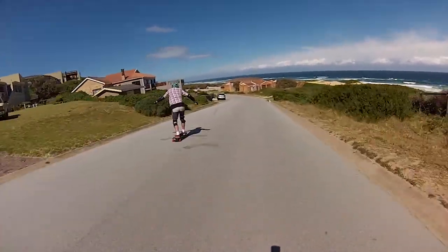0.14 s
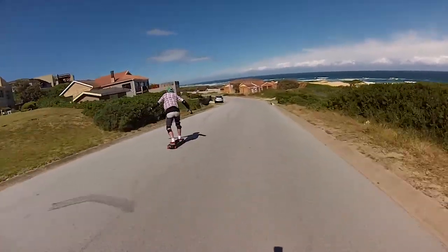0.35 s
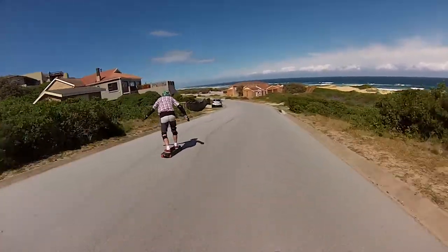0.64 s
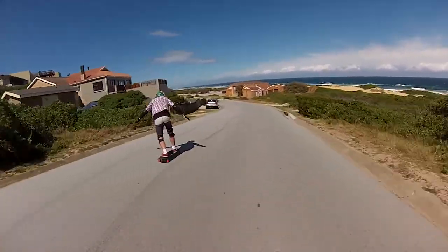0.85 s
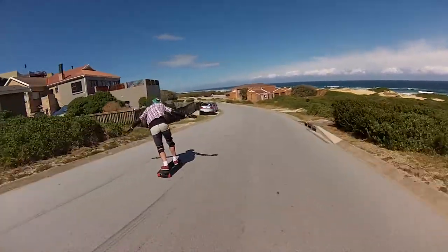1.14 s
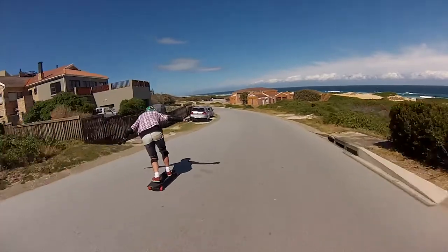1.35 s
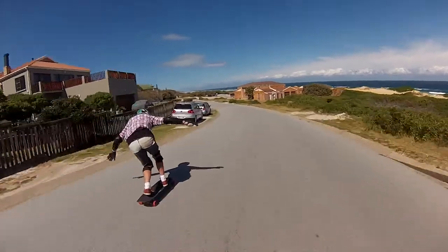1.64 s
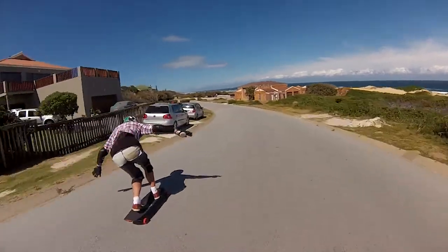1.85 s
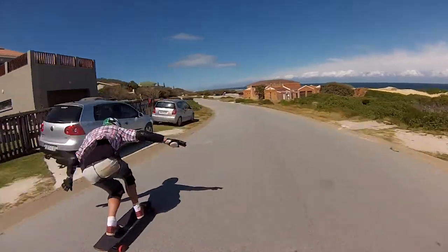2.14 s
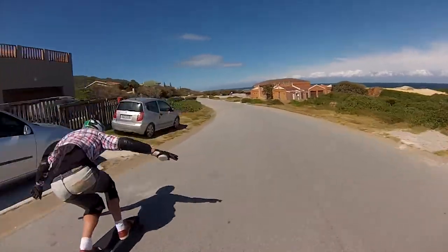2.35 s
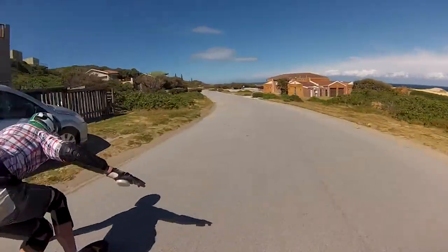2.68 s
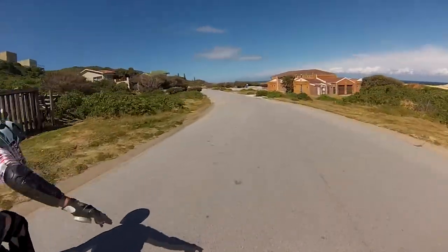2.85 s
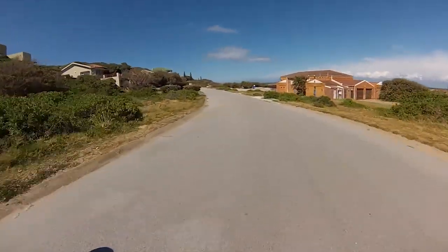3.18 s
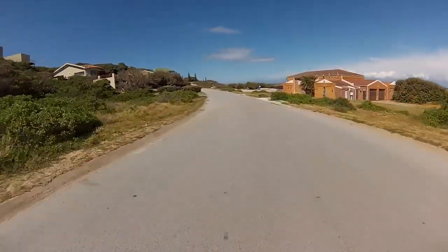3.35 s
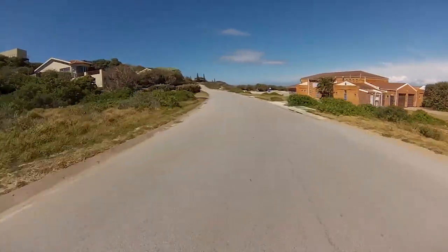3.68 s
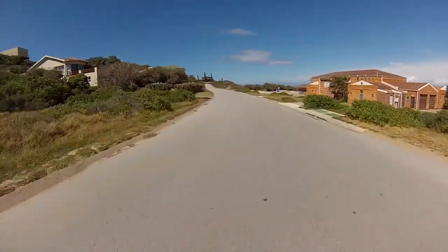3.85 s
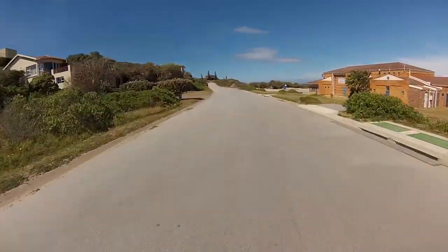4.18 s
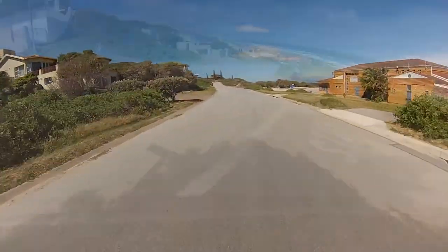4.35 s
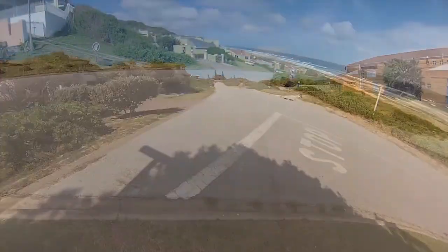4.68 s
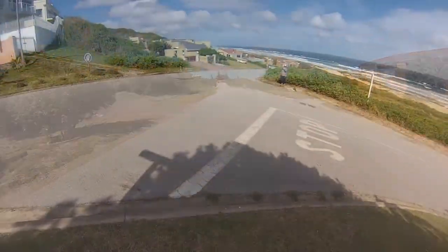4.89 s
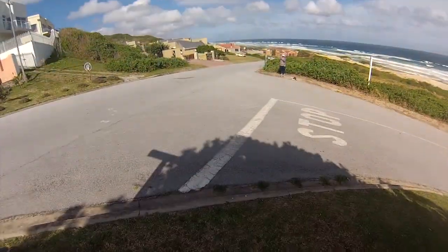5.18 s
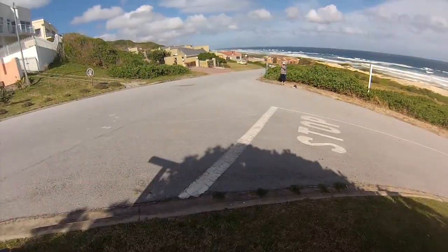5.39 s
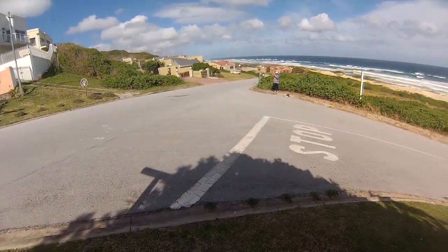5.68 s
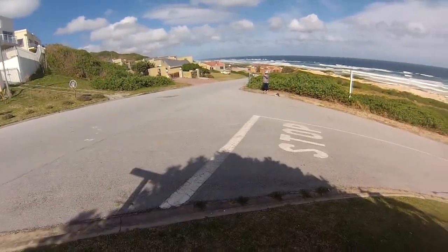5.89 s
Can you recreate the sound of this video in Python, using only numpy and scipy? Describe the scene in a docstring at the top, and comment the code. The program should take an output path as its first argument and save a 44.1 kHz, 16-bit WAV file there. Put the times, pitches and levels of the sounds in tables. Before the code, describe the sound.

Close on a longboard speeding downhill, a sealed camera picks up a continuous coarse wheel roar, hollow deck hum and gritty hiss, with pulsing low rumble and muffled wind thuds. After about four seconds it cuts off hard. At a quiet roadside the camera is knocked, rubbed and wobbled by a hand, and finally another board's rolling hiss rises quickly.

```python
"""A longboard rides downhill: shared road bumps shake noise through deck, housing and grit resonances.
It carries a camera in a sealed housing; its mount adds a low, unsteady tone, and wind thuds beneath.
The ride cuts off; the camera is then held at the roadside, where it wobbles and is rubbed and knocked.
There another board rolls up and hisses past as patchy resonant noise, over quiet open air."""
import sys
import numpy as np
from scipy import signal
from scipy.fft import rfft, irfft
from scipy.io import wavfile
from scipy.ndimage import uniform_filter1d

SR = 44100
rng = np.random.default_rng(int(sys.argv[2]) if len(sys.argv) > 2 else 0)


def boost(x):
    """Linear amplitude factor 10**(x/20) for a level x in decibels (scalar or array-like)."""
    u = np.asarray(x, float) / 20
    return 10 ** u


def wav_record(signal):
    """Record a signal, one row per channel, as 16-bit PCM in the file named by sys.argv[1]."""
    frames = np.transpose(np.atleast_2d(signal))
    bounded = np.clip(frames, -1, 1)
    # unit amplitude maps onto the largest positive 16-bit level
    quanta = np.round(bounded * 32767).astype(np.int16)
    wavfile.write(sys.argv[1], SR, quanta)


N = 265482
T = np.arange(N) / SR
CUT_S = 4.187  # the ride ends and the roadside begins

# resonances of the held housing: (frequency [Hz], width [Hz], relative level [dB])
SHELL = [(331, 42, 1.5), (622, 110, -8.5), (1220, 320, -4.5), (1994, 170, 2), (2330, 250, -4),
         (2650, 280, -4), (3760, 270, -19.5), (4400, 300, -23), (5320, 470, -24.5)]
# jolt of the first knock: (time [s], level [dB], frequency [Hz], decay to either side [cycles])
JOLT = (4.2645, -7.5, 44, .45)


def level(x):
    """Scale to rms 1."""
    return x / np.sqrt(np.mean(x ** 2))


def columns(table):
    """Every column after the first as a curve over time."""
    s, *cols = np.transpose(table)
    return [np.interp(T, s, c) for c in cols]


def shape(x, power):
    """Filter with the minimum-phase response that has this power at each Hz, built from its cepstrum."""
    size = 8192
    hz = np.fft.rfftfreq(size, 1 / SR) + 1  # the offset avoids log(0)
    cepstrum = irfft(.5 * np.log(power(hz) + 1e-12))
    # folding onto positive times makes the response causal
    cepstrum[1:size // 2] *= 2
    cepstrum[size // 2 + 1:] = 0
    response = irfft(np.exp(rfft(cepstrum)))
    return signal.fftconvolve(x, response)[:N]


def ring(x, modes, steep=1.48):
    """Excite a body with these resonances; a higher steep gives each peak steeper skirts."""
    def power(f):
        return sum(boost(db) ** 2 / (1 + (2 * (f - hz) / width) ** 2) ** steep for hz, width, db in modes)
    return shape(x, power)


def colour(x, points):
    """Filter to a smooth spectrum drawn through (Hz, dB) points."""
    hz, db = np.transpose(points)
    return shape(x, lambda f: boost(2 * np.interp(np.log(f), np.log(hz), db)))


def walk(rate):
    """Random levels held 1 / rate s and smoothed twice; rms 1."""
    k = int(SR / rate)
    held = np.repeat(rng.standard_normal(N // k + 1), k)
    return level(uniform_filter1d(uniform_filter1d(held, k), k)[:N])


def grain(patchy_db, rate):
    """Dense contact noise whose strength comes in patches."""
    return level(rng.standard_normal(N) * boost(patchy_db * walk(rate)))


def swells(events, gain):
    """Sum of bell-shaped swells, each as long as the span between its 1/e points."""
    return sum(gain(db) * np.exp(-(2 * (T - s) / length) ** 2) for s, length, db in events)


def thuds(modes, patchy_db):
    """Dull low thuds: slowly patchy noise through low resonances."""
    return level(ring(grain(patchy_db, 12), modes, steep=2.47))


def unsteady_tone(table, events, drift, flutter_db, buffet_db):
    """A low tone that wanders in pitch, flutters and swells, over deep buffeting."""
    hz, resting_db = columns(table)
    phase = 2 * np.pi * np.cumsum(hz * (1 + drift * walk(30))) / SR
    tone = level(boost(flutter_db * walk(45)) * np.sin(phase))
    buffet = level(ring(rng.standard_normal(N), [(23.8, 20, 0.012)], steep=2.67))
    return (boost(resting_db) + swells(events, boost)) * (tone + boost(buffet_db) * buffet)


def open_air():
    """Quiet roadside air: slightly uneven noise with a smooth spectrum."""
    # spectrum of the air: (frequency [Hz], relative density [dB per Hz])
    air_spectrum = [(59, -45), (100, -14), (162, -8.5), (320, -5), (870, -20), (1830, -32), (2060, -18),
                    (3070, -32.5), (12000, -34), (15600, -74), (22000, -120)]
    return boost(-58) * level(colour(grain(0.84, 10), air_spectrum))


def other_board():
    """A dull roll from afar; the bright wheel hiss comes only when the board is alongside."""
    # approach of the board: (time [s], rolling level [dB], wheel hiss level [dB])
    passing = [(4.2, -61.5, -68), (5.2, -60, -71.5), (5.75, -53.5, -65.5), (5.866, -52, -57),
               (5.878, -44, -45), (5.91, -49, -42), (5.935, -41.5, -44), (5.97, -46, -39.5),
               (6.02, -49, -45)]
    # resonances of the roll: (frequency [Hz], width [Hz], relative level [dB])
    roll_modes = [(330, 28, 1), (600, 110, -2), (1450, 390, 4), (2350, 900, -6.5), (4850, 730, -15.5)]
    # bands of the wheel hiss: (frequency [Hz], width [Hz], relative level [dB])
    hiss_modes = [(2320, 450, -2), (3500, 1200, 0), (4500, 690, -2), (5200, 400, -0.5), (6900, 1400, -3.5),
                  (11100, 1900, -12)]
    roll_db, hiss_db = columns(passing)
    roll = level(ring(grain(2.1, 30), roll_modes))
    hiss = level(ring(grain(1.5, 70), hiss_modes))
    return boost(roll_db) * roll + boost(hiss_db) * hiss


def hand_wobble():
    """A low, unsteady tone of the held camera wobbling; it comes up just after the jolt."""
    # tone of the wobble: (time [s], central pitch [Hz], resting level [dB])
    wobble_curve = [(4.3, 30.43, -30), (4.55, 29.43, -37), (4.7, 27.35, -31.5), (5.1, 26.3, -29.5),
                    (5.3, 27.3, -32.5), (5.55, 30.4, -33), (5.8, 29.1, -38), (6.02, 29.3, -39)]
    # swells of the low tone: (middle [s], length [s], level [dB])
    wobble_swells = [(4.287, 0.16, -23), (4.504, 0.038, -26), (4.787, 0.039, -36), (5.17, 0.043, -25),
                     (5.312, .08, -36), (5.62, 0.05, -31), (5.706, 0.082, -28)]
    onset = np.interp(T - JOLT[0], [.01, .03], [.3, 1])
    return unsteady_tone(wobble_curve, wobble_swells, drift=0.049, flutter_db=0.8, buffet_db=-5) * onset


def grip_bumps():
    """The gripping hand bumps the housing dully over a faint bed of the same thuds."""
    # bumps of the grip: (middle [s], length [s], level [dB])
    grip = [(4.31, .05, -36), (4.515, 0.063, -31), (4.62, 0.064, -30), (4.95, 0.082, -31), (5.03, .07, -31),
            (5.09, .05, -36), (5.2, .18, -34), (5.4, .06, -44), (5.64, .06, -42), (5.97, .1, -49)]
    still_db = -50.5
    thud = thuds([(66, 36, -0.5), (122, 112, -19)], 2.7)
    return (boost(still_db) + swells(grip, boost)) * thud


def finger_strokes():
    """Sliding fingers ring the shell; where they press decides which modes speak."""
    # strokes: (full strength reached [s], length [s], low modes [dB], 1.2 kHz mode [dB], middle modes [dB])
    strokes = [(4.269, 0.056, -60, -68, -53), (4.41, 0.053, -56, -55, -50), (4.474, 0.027, -50, -52.5, -57),
               (4.534, 0.046, -60, -59, -55.5), (4.6, .07, -52, -51.5, -52),
               (4.985, 0.039, -42, -54.5, -48), (5.029, .04, -53, -55, -51),
               (5.134, 0.066, -57.5, -57, -57)]
    attack_s, release_s, fade_db_s = 0.036, .018, -27
    high_db = -11  # high modes relative to the middle ones
    slides = []
    for modes in (SHELL[:2], SHELL[2:3], SHELL[3:6], SHELL[6:]):
        voices = [boost(1.5 * walk(16)) * ring(grain(1.9, 110), [mode], steep=1.67) for mode in modes]
        slides.append(level(sum(voices)))
    out = np.zeros(N)
    for s, length, low_db, one_db, middle_db in strokes:
        attack = np.clip((T - s) / attack_s + 1, 0, 1) ** 2
        release = np.exp(-np.maximum(T - s - length, 0) / release_s)
        fade = boost(fade_db_s * np.clip(T - s, 0, length))
        levels_db = (low_db, one_db, middle_db, middle_db + high_db)
        out += attack * release * fade * sum(boost(db) * slide for db, slide in zip(levels_db, slides))
    return out


def knocks():
    """Knocks rattle the same shell: short noise bursts through its middle and high modes."""
    # knocks: (time [s], peak level [dB], rattle time constant [ms], high modes' brightness [dB])
    knock_table = [(4.2555, -19, 2.2, 3), (4.2647, -33, 1.9, 11), (4.812, -46.5, 7.6, -20),
                   (5.11, -30, 1.1, 11.5)]
    chatter = rng.standard_normal(N)
    out = np.zeros(N)
    for s, db, ms, bright_db in knock_table:
        age = np.maximum(T - s, 0) * 1000 / ms
        rattle = chatter * age ** 0.33 * np.exp(-age)
        body = ring(rattle, SHELL[2:6], steep=1.02)
        edge = ring(rattle, SHELL[6:], steep=2.2)
        tick = body + boost(bright_db) * edge
        out += boost(db) * tick / np.abs(tick).max()
    return out


def jolt():
    """The first knock jolts the camera: a brief low swing under a bell envelope."""
    s, db, hz, cycles = JOLT
    turn = (T - s) * hz
    swing = np.sin(2 * np.pi * turn + .5) * np.exp(-(turn / cycles) ** 2)
    # the rebound stops short against the hand: a pointed crest
    crest = 0.21 * np.exp(-(np.abs(turn - .09) / 0.066) ** 1.8)
    return boost(db) * (swing + crest)


def riding_wind():
    """Wind thuds low and unevenly during the ride."""
    # strength of the wind: (time [s], level [dB])
    wind = [(0, -39), (.7, -36.5), (1.3, -31), (1.9, -35), (2.4, -40.5), (3.2, -38), (3.7, -39.5),
            (4.18, -37.5)]
    return boost(columns(wind)[0]) * thuds([(77.4, 23, -5), (109.0, 23.0, -1.5)], 4.0)


def mount_tone():
    """A low, unsteady tone of the mount, swelling and fading irregularly."""
    # tone of the mount: (time [s], central pitch [Hz], resting level [dB])
    tone_curve = [(0, 41, -27), (.6, 44.96, -29), (1.05, 36.1, -31), (1.6, 42.42, -36.5), (2.45, 46, -33),
                  (2.7, 41.6, -30), (2.95, 45.1, -30.5), (3.55, 45.1, -30.5), (3.7, 39, -29),
                  (4.18, 43.1, -28)]
    # swells of the low tone: (middle [s], length [s], level [dB])
    tone_swells = [(0.103, 0.089, -28), (0.236, 0.077, -17.5), (0.422, 0.1, -17), (0.594, 0.058, -25),
                   (0.705, 0.062, -19.5), (0.846, .1, -16.5), (0.986, 0.051, -15), (1.196, 0.057, -12.5),
                   (1.3, 0.11, -18.5), (1.392, 0.086, -19), (1.535, 0.13, -15), (1.696, 0.062, -17.5),
                   (1.824, 0.11, -19), (2.055, 0.15, -18.5), (2.256, 0.11, -22.5), (2.402, 0.079, -18),
                   (2.604, 0.086, -24.5), (2.698, 0.063, -18), (2.845, 0.055, -28), (3.079, 0.2, -27),
                   (3.227, 0.075, -24), (3.375, 0.13, -19.5), (3.56, 0.13, -26), (3.85, 0.14, -29),
                   (4.04, 0.13, -30.5)]
    return unsteady_tone(tone_curve, tone_swells, drift=0.121, flutter_db=2.5, buffet_db=-5)


def ride():
    """Stones in the asphalt shake wheels, deck and housing together, so all bands share the bumps."""
    # rolling noise between its swells: (time [s], level [dB])
    rolling_curve = [(0, -22), (.5, -22), (.9, -21), (1.3, -20), (1.45, -25), (2.0, -24), (2.8, -26),
                     (3.1, -23.5), (3.2, -24.5), (3.6, -24), (4.05, -26.5), (4.18, -24.5)]
    # brief swells of the rolling noise: (middle [s], length [s], added level [dB])
    rolling_swells = [(.27, 0.094, 3.5), (.47, 0.039, 2), (.7, 0.12, 6.5), (.84, 0.02, 4.5),
                      (1.03, 0.08, 3.5), (1.18, 0.034, 1.5), (1.5, 0.14, 4.5), (1.65, .05, 4),
                      (1.82, 0.097, 4), (2.03, 0.09, 2), (2.32, 0.14, 5), (3.39, 0.12, 4), (3.54, 0.053, 2),
                      (3.82, 0.13, 3.5)]
    # hum of the deck: (time [s], low modes level [dB], high mode level [dB])
    hum = [(0.0, -22, -41), (0.07, -28.5, -26), (0.14, -32, -33.5), (0.3, -32.5, -26), (0.33, -29.5, -33),
           (0.7, -30.5, -28.5), (0.81, -32.5, -29.5), (1.44, -26, -38), (1.49, -21, -27.5),
           (1.61, -37.5, -40), (1.64, -22, -39), (1.77, -32.5, -38), (1.85, -23.5, -34), (2.19, -31, -43),
           (2.27, -29, -30.5), (2.76, -30.5, -38.5), (2.78, -28, -37.5), (3.34, -26.5, -39.5),
           (3.38, -32, -25.5), (3.43, -28, -33), (3.72, -35.5, -35), (3.85, -26, -35.5), (4.1, -34.5, -41),
           (4.18, -26, -36.5)]
    # random wander of the hum: (low modes [dB], high mode [dB])
    hum_wander_db = (0.5, 1.47)
    # resonances of the deck, two low and one high: (frequency [Hz], width [Hz], relative level [dB])
    deck_modes = [(359, 66, -9), (409.8, 33.4, 0), (700.5, 40, -7)]
    # resonances of the housing: (frequency [Hz], width [Hz], relative level [dB])
    housing_modes = [(1284, 391, -2), (1486, 400, -3.5), (1955, 260, -5.5), (2120, 760, -7.5),
                     (2530, 780, -15)]
    # bands of the grit's hiss: (frequency [Hz], width [Hz], relative level [dB])
    grit_modes = [(3610, 1020, -2.5), (4000, 110, 2), (4500, 130, -14), (5155, 120, 1.5), (6210, 360, -6),
                  (7800, 1000, -14), (10950, 1900, -19)]
    # road noise under the resonances: (frequency [Hz], relative density [dB per Hz])
    road_spectrum = [(60, 1), (110, -4.5), (175, -2.5), (260, -6.5), (600, -12), (900, -30), (3000, -22.5),
                     (6000, -26.5), (12000, -41)]
    average_db, average_grit_db = -22.5, -35.5  # average rolling level and the hiss that goes with it
    grit_slope, road_db = 1.01, -7  # dB of hiss per dB of rolling; road relative to housing

    rolling_db = columns(rolling_curve)[0] + swells(rolling_swells, float) + 0.7 * walk(24.87)
    grit_db = average_grit_db + grit_slope * (rolling_db - average_db) + 0.61 * walk(9)
    low_db, high_db = (db + wander_db * walk(12) for db, wander_db in zip(columns(hum), hum_wander_db))
    bumps = boost(.5 * walk(24.61) + 0.45 * walk(180))
    low = level(ring(bumps * grain(0.4, 40), deck_modes[:2], steep=1.37))
    high = level(ring(bumps * grain(0.4, 40), deck_modes[2:], steep=1.37))
    housing = level(ring(bumps * grain(0.38, 60), housing_modes, steep=2.4))
    grit = level(ring(bumps * grain(0.36, 90), grit_modes, steep=1.0))
    road = level(colour(bumps * grain(0.27, 30.17), road_spectrum))
    rolling = boost(rolling_db) * (housing + boost(road_db) * road)
    deck = boost(low_db) * low + boost(high_db) * high
    return rolling + deck + boost(grit_db) * grit


def scene():
    """The ride, a hard cut, then the roadside fading in within 12 ms."""
    riding = ride() + mount_tone() + riding_wind()
    handling = grip_bumps() + finger_strokes() + knocks() + jolt()
    roadside = hand_wobble() + handling + other_board() + open_air()
    ride_gain = np.clip((CUT_S - T) / 0.0018, 0, 1)
    roadside_gain = np.clip((T - CUT_S) / 0.012, 0, 1)
    return (riding * ride_gain + roadside * roadside_gain)[None]


def roll_off(x):
    """The treble ends steeply here."""
    return signal.sosfilt(signal.butter(12, 12190, fs=SR, output="sos"), x)


def record(dry):
    """The microphone drops the deepest bass and the top."""
    x = signal.sosfilt(signal.butter(2, 16, "high", fs=SR, output="sos"), dry)
    x = signal.sosfilt(signal.butter(12, 11500, fs=SR, output="sos"), x)
    return roll_off(x)


dry = scene()
out = record(dry)
wav_record(out)
```